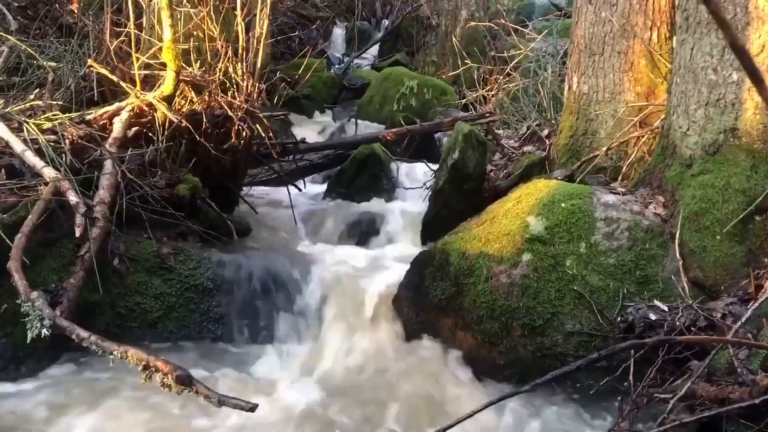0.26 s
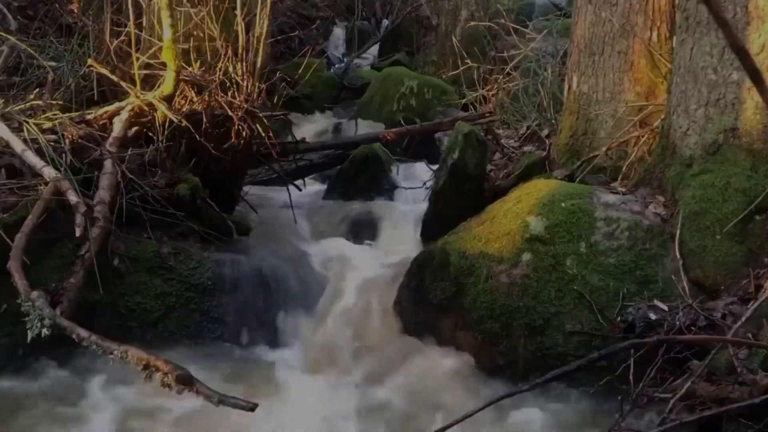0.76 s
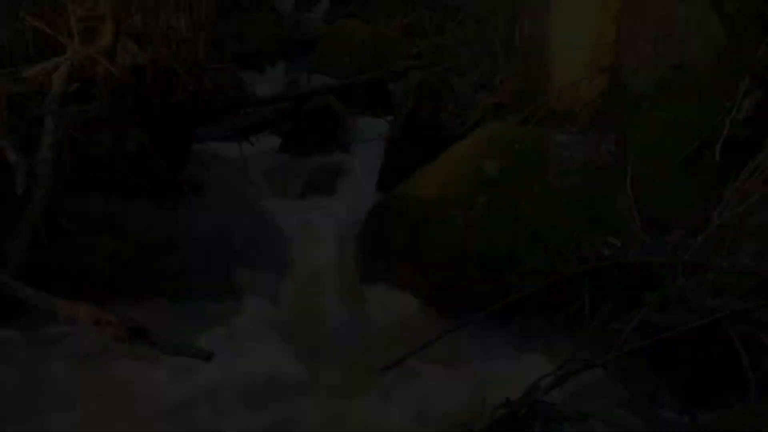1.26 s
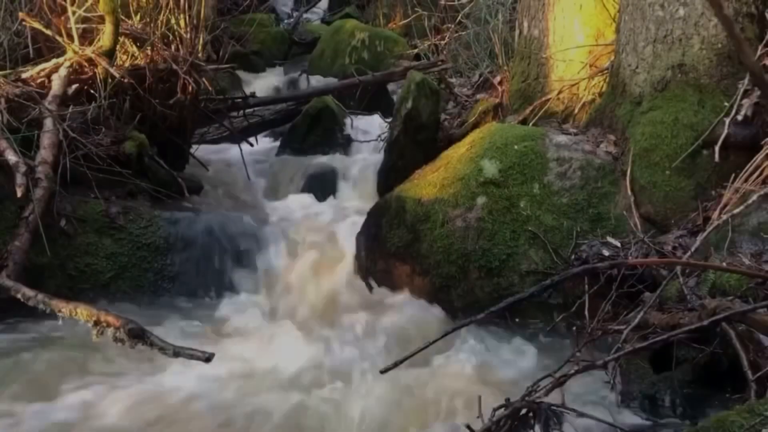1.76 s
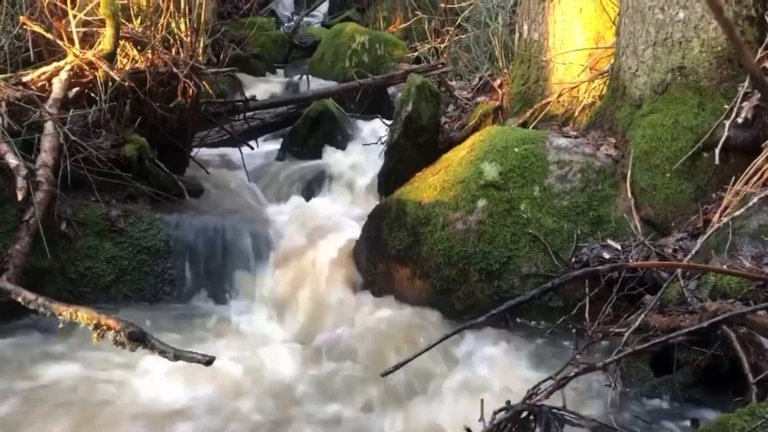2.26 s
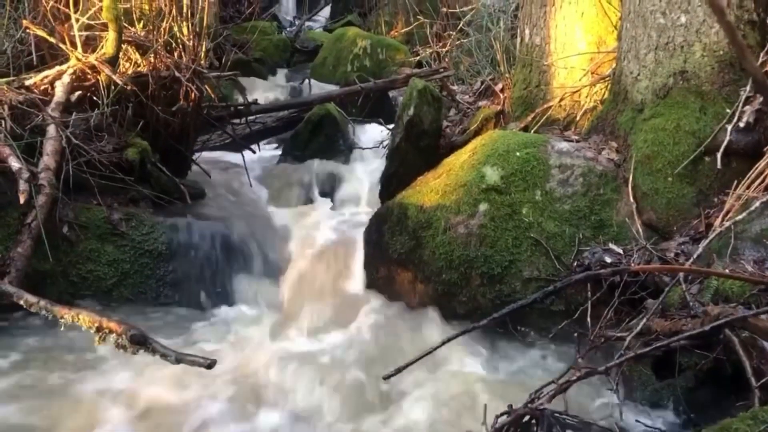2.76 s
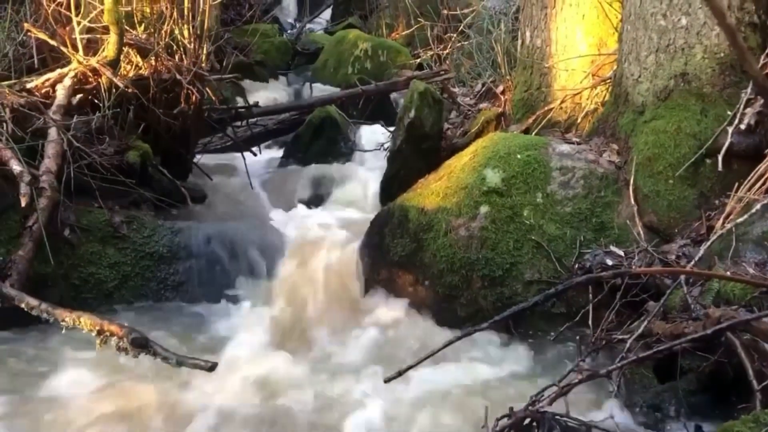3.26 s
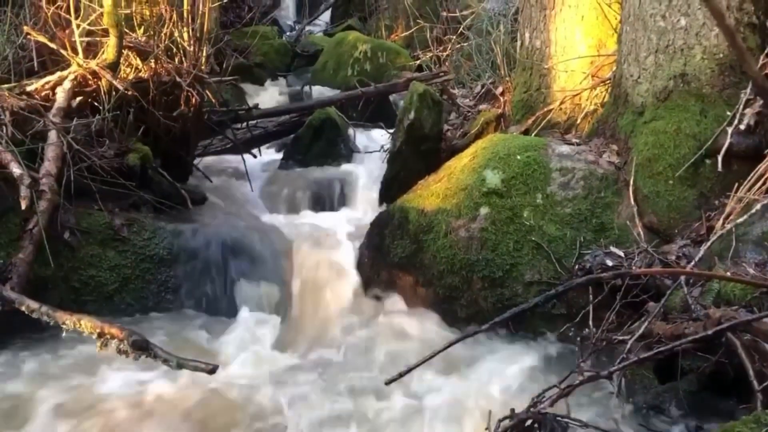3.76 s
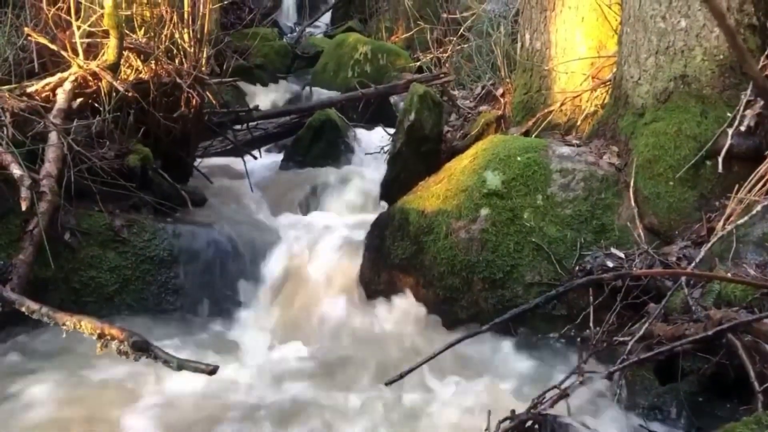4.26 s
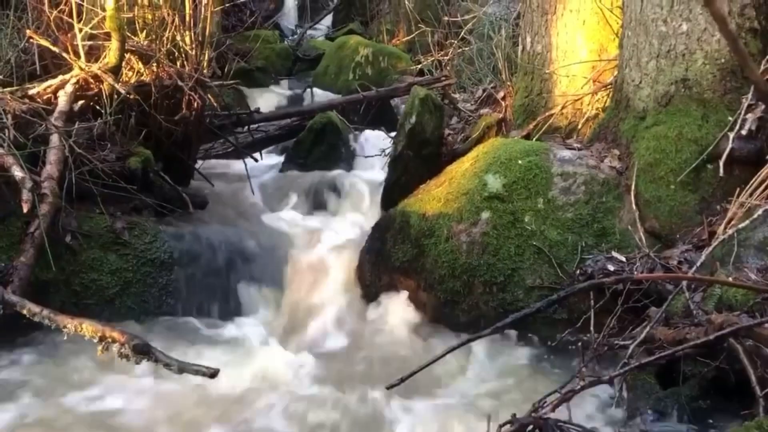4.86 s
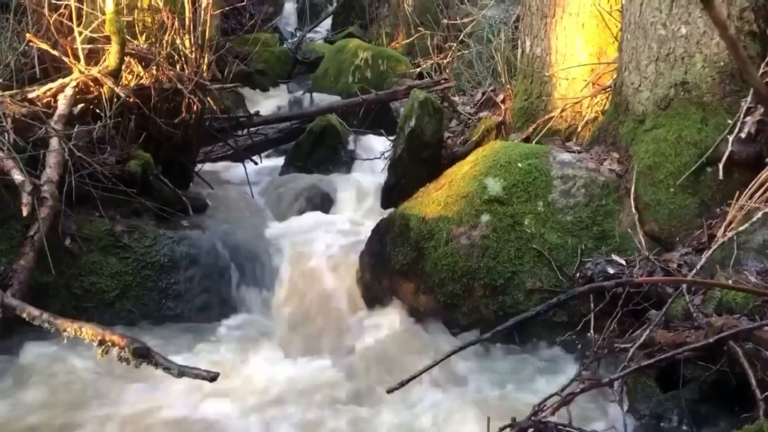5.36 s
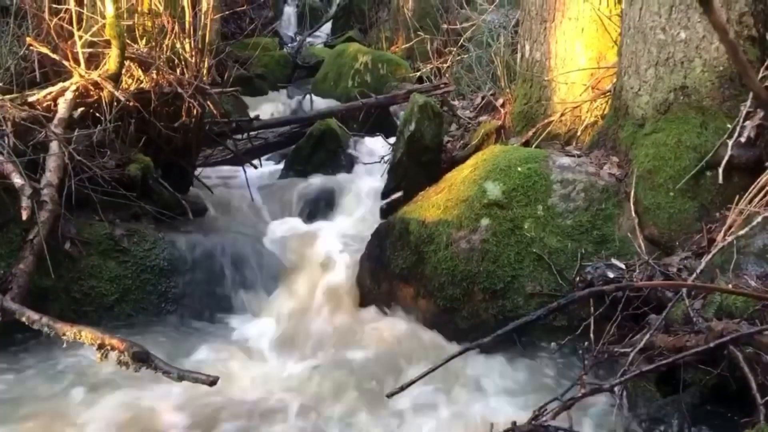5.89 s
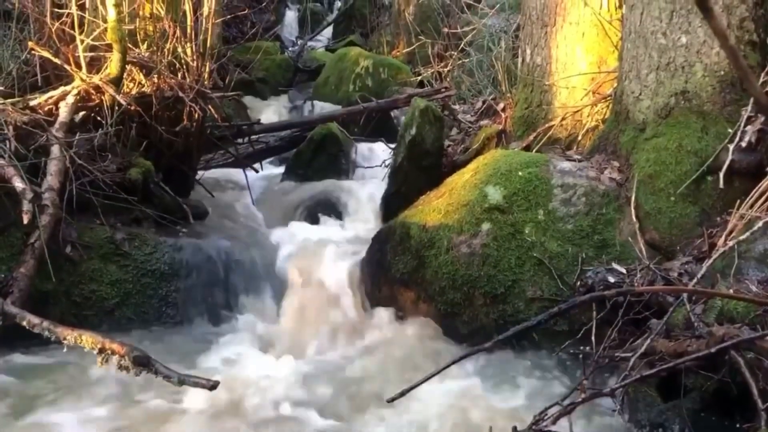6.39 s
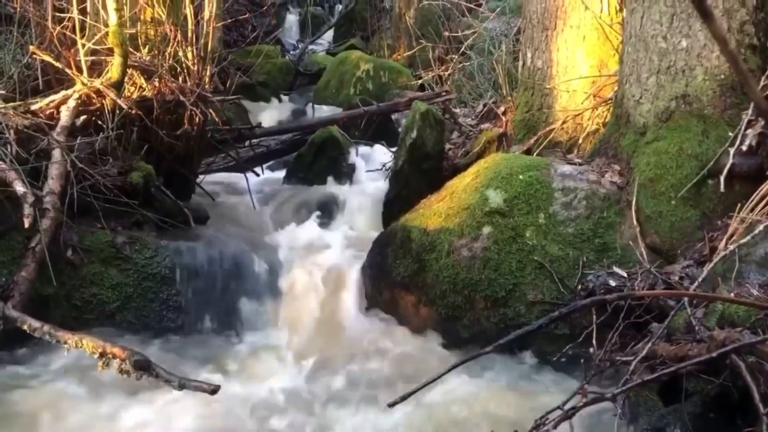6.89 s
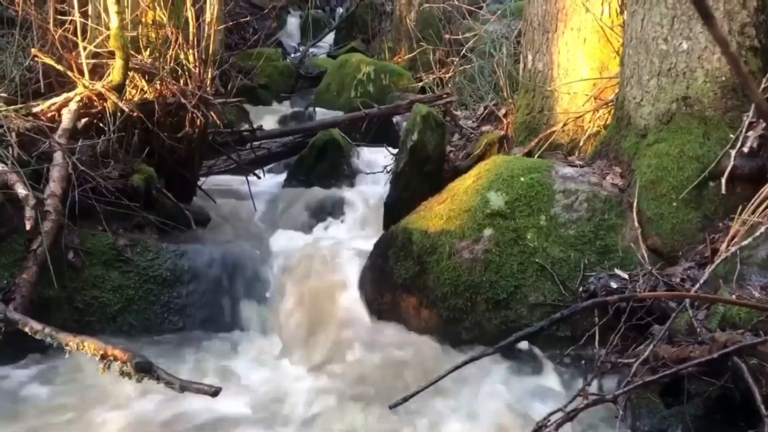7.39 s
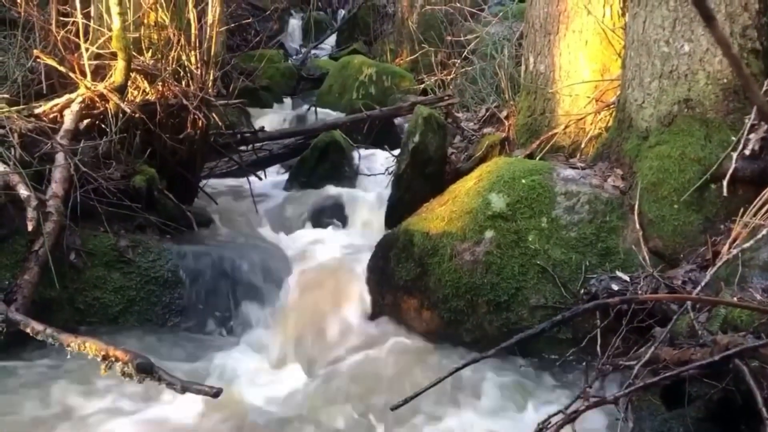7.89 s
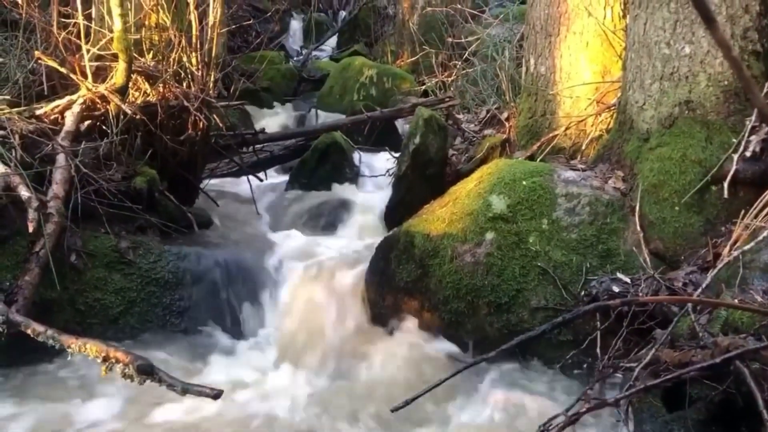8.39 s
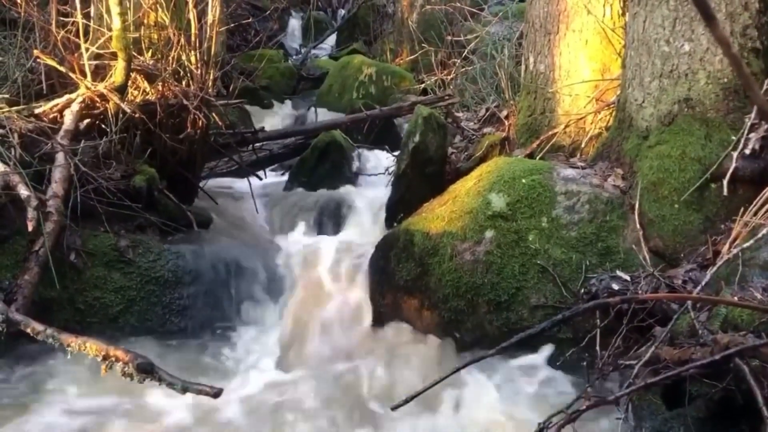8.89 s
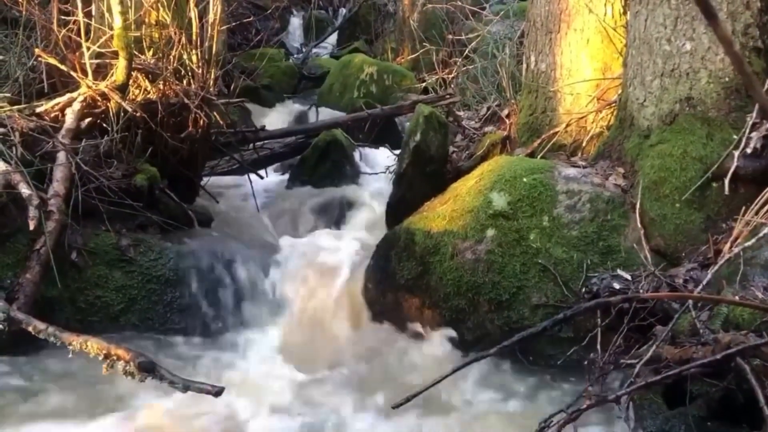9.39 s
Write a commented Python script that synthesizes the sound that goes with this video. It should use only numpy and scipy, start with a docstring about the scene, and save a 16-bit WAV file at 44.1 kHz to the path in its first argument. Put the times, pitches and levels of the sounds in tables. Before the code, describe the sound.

White water plunges between boulders into a churning pool, heard from the bank of a forest stream. A bubbling roar carries a hiss of foam above and a soft rumble below. The sound fades away to a moment of silence about a second in, then fades back up. It runs on steadily with slight surges, dotted with small gulps, glugs, sloshes and the bright ticks of drops.

```python
"""White water plunges down a small cascade between boulders into a churning pool.
The plunge roars and traps ringing air bubbles; bursting foam and flung drops hiss above it.
Single gulps, glugs, sloshes, ticks and slaps stand out, and bubble clouds rumble below.
The sound fades out, is silent from 1.04 to 1.15 s and fades back in."""
import sys
import numpy as np
from scipy import signal
from scipy.fft import rfft, irfft, next_fast_len
from scipy.io import wavfile

SR = 44100
rng = np.random.default_rng(int(sys.argv[2]) if len(sys.argv) > 2 else 0)


def log_audio(samples):
    """Write samples as a 16-bit WAV file to the path given in sys.argv[1]."""
    # one column per channel
    frames = np.atleast_2d(samples).T
    # limit to full scale, then quantise
    limited = np.clip(frames, -1, 1)
    pcm = np.round(limited * 32767).astype(np.int16)
    wavfile.write(sys.argv[1], SR, pcm)


N = 425565


def gain_of(db):
    """Decibels to amplitude."""
    return 10 ** (np.asarray(db) / 20)


def unit_rms(x):
    """Scales to rms 1."""
    return x / np.sqrt(np.mean(x ** 2) + 1e-20)


def curve(rows):
    """Interpolates (seconds, value) rows at every sample."""
    return np.interp(np.arange(N) / SR, *np.transpose(rows))


def coloured(x, rows):
    """Filters x by (Hz, dB) rows, then scales to rms 1."""
    size = next_fast_len(N)
    hz, db = np.transpose(rows)
    shape_db = np.interp(np.log(np.fft.rfftfreq(size, 1 / SR) + 1), np.log(hz), db)
    return unit_rms(irfft(rfft(x, size) * gain_of(shape_db), size)[:N])


def wander(rate_hz):
    """Smooth random motion of rms 1, strongest near rate_hz."""
    size = next_fast_len(N)
    ratio = np.fft.rfftfreq(size, 1 / SR) / rate_hz
    spectrum = rfft(rng.standard_normal(size)) * ratio / (1 + ratio ** 3)
    return unit_rms(irfft(spectrum, size)[:N])


def add(mix, start_s, sound):
    """Mixes a sound in, in place."""
    part = mix[max(round(start_s * SR), 0):][:len(sound)]
    part += sound[:len(part)]


def bubble(hz, cycles, rise):
    """Trapped air rings, decaying to 1/e in `cycles`; its pitch rises as it nears the surface."""
    age = np.arange(int(5 * cycles / hz * SR)) * hz / (SR * cycles)  # in decay times
    turns = cycles * (age + rise * age ** 2 / 2)
    return np.sin(2 * np.pi * turns) * np.exp(-age) * (1 - np.exp(-2 * turns))


def swarm(low_hz, high_hz, per_s, cycles, rise, spread_db, sizes=40):
    """Bubbles of many sizes, most faint and a few strong, with even power per Hz."""
    out = np.zeros(N)
    per_size = int(per_s * N / SR / sizes)
    for hz in np.geomspace(low_hz, high_hz, sizes):
        when, strength = rng.random((2 ** 13, 2))[:per_size].T
        gains = gain_of(spread_db * np.minimum(-np.log(1 - strength), 4))
        signs = (-1) ** np.arange(len(gains))
        births = np.bincount((when * N).astype(int), gains * signs, N)
        ring = bubble(hz, cycles * 2 ** rng.uniform(-0.52, 0.56), rise)
        out += np.sqrt(hz) * unit_rms(signal.oaconvolve(births, ring)[:N])
    return unit_rms(out)


# Each row: frequency in Hz, relative level in dB.
PLUNGE_SPECTRUM = [(90, -31.5), (190, -7), (255, 0.74), (310, -1), (390, 0.5), (480, -2), (570, -3),
                   (740, 0.5), (890, -2), (1020, -5), (1270, -5.5), (1600, -11.5), (2100, -17), (9000, -45)]


def plunge(flow_db, roar_db=4.5, churn_db=-0.3, level_db=-29.0):
    """The falling jet drags air under: near bubbles gurgle over the blurred roar of the rest."""
    gurgle = swarm(179.5, 3205, per_s=2500, cycles=5.55, rise=0.0888, spread_db=2.0)
    roar = gain_of(roar_db) * rng.standard_normal(N)
    water = coloured(gurgle + roar, PLUNGE_SPECTRUM)
    churn = gain_of(churn_db * wander(rate_hz=26))
    return unit_rms(water * churn) * gain_of(level_db + flow_db)


# Each row: time in seconds, level offset in dB.
FLOW_DRIFT = [(0, 1.65), (2.3, 0.5), (2.85, -0.2), (3.15, 0.7), (3.8, -0.15), (4.3, 0.5), (5.05, 0),
              (5.7, 0.5), (6.6, 0), (7.4, 0.5), (7.85, -1), (8.3, 0.8), (8.6, -0.2), (9.4, 0.7),
              (9.65, -0.2)]
# Each row: centre in seconds, level offset in dB (negative for a lull), length in seconds.
FLOW_SURGES = [(0.25, 1.5, 0.073), (0.515, -3.5, 0.084), (2.113, 1, 0.066), (2.368, 2, 0.095),
               (2.494, -1, .09), (2.588, 1, 0.18), (3.225, 2.4, 0.12), (3.44, 1, 0.06), (3.65, 0, 0.085),
               (3.904, -2, 0.056), (4.447, 0.5, 0.11), (5.23, 2.5, .1), (5.455, 2.5, 0.072),
               (5.88, -2, 0.098), (5.953, 1.5, .07), (7.03, 1, .11), (7.728, 1.5, .08), (8.55, -1.5, 0.089),
               (8.865, -1.5, 0.076), (8.936, 1, 0.082)]


def flow(ripple_db=0.23, ripple_hz=8.3):
    """How hard the water falls, in dB: slow drift, random ripple, surges as slugs of water drop."""
    flow_db = curve(FLOW_DRIFT) + ripple_db * wander(ripple_hz)
    for centre_s, db, length_s in FLOW_SURGES:
        add(flow_db, centre_s - length_s / 2, db * np.hanning(round(length_s * SR)))
    return flow_db


# Each row: frequency in Hz, relative level in dB.
SPRAY_SPECTRUM = [(600, -23), (1500, 6), (2300, 1), (3300, 1), (4400, -0.5), (5600, -1), (7000, -2.5),
                  (8800, -4), (9500, -33.5)]


def spray(flow_db, hiss_db=3.0, drops_db=-1.8, plink_db=-7.0, burst_db=0.56, clump_db=2.0,
          level_db=-34.0):
    """Tiny bubbles fizz and plink and drops tick on the water, in quick bursts over a smooth hiss."""
    fizz = swarm(1205, 9470, per_s=6500, cycles=6.0, rise=0.019, spread_db=0.5)
    plinks = swarm(1500, 8500, per_s=360, cycles=36, rise=0.034, spread_db=2.0)
    impacts = rng.standard_normal(N) * (rng.random(N) < 2600 / SR)  # 2600 per second
    drops = unit_rms(impacts * gain_of(clump_db * wander(rate_hz=45)))
    hiss = gain_of(hiss_db) * rng.standard_normal(N)
    water = fizz + gain_of(plink_db) * plinks + gain_of(drops_db) * drops + hiss
    bursts = gain_of(burst_db * wander(rate_hz=7.3))
    return unit_rms(coloured(water, SPRAY_SPECTRUM) * bursts) * gain_of(level_db + flow_db)


# Each row: start in seconds, relative level in dB, pitch in Hz.
GULP_BUBBLES = [(0.055, -24, 760), (0.248, -18, 697), (0.447, -19, 705), (1.222, -11, 880),
                (1.447, -11, 415), (1.994, -18, 810), (2.099, -22, 360), (2.349, -22, 679.5),
                (2.359, -25, 374), (2.409, -18, 726), (2.579, -21, 336), (2.6, -18.5, 412),
                (2.721, -22, 152), (2.925, -23, 336), (3.492, -20, 403), (3.958, -17, 356),
                (3.962, -18, 735), (4.445, -20.5, 750), (4.943, -20, 805), (5.414, -21, 710),
                (5.487, -19, 580), (5.794, -21, 594), (6.296, -20, 565), (6.718, -18.5, 700),
                (7.013, -24, 750), (7.069, -22, 744), (7.731, -17.5, 730), (7.959, -22, 860),
                (8.212, -17, 1170), (8.627, -20, 790), (8.805, -23, 770), (8.808, -25, 900),
                (8.94, -21, 474), (9.168, -21, 790)]


def gulps(level_db=0.5):
    """Single bubbles stand out of the roar; smaller ones ring for more cycles."""
    out = np.zeros(N)
    for start_s, db, hz in GULP_BUBBLES:
        add(out, start_s, gain_of(db + level_db) * bubble(hz, cycles=0.17 * np.sqrt(hz), rise=0.029))
    return out


# Each row: start in seconds, peak in dB, first and last pitch in Hz, length in seconds.
GLUG_POCKETS = [(2.191, -26.5, 363, 440, .05), (2.684, -31, 720, 820, 0.038), (3.597, -28, 695, 800, .045),
                (4.378, -37, 210, 340, .035), (4.955, -29, 785, 870, 0.053), (6.238, -34, 774, 870, .035),
                (6.433, -27.5, 599, 710, 0.045), (6.957, -28, 252, 505, .052),
                (8.269, -29, 335, 430, 0.035)]


def glugs():
    """A large air pocket swells into tone and climbs in pitch as it surfaces."""
    out = np.zeros(N)
    for start_s, db, first_hz, last_hz, length_s in GLUG_POCKETS:
        progress = np.linspace(0, 1, int(length_s * SR))
        turns = np.cumsum(first_hz * (last_hz / first_hz) ** progress) / SR
        swell = np.sin(np.pi * progress)
        add(out, start_s, gain_of(db) * swell * np.sin(2 * np.pi * turns))
    return out


# Each row: centre in seconds, relative level in dB, first and last pitch in Hz, length in seconds.
SLOSH_RUNS = [(1.86, -34.5, 554, 620, .07), (1.91, -31, 775, 887, .045), (2.118, -33, 300, 235, .04),
              (3.659, -31.5, 610, 1040, 0.062), (4.46, -31, 804, 600, 0.066),
              (4.817, -36, 1501, 1470, 0.076), (5.37, -31.5, 900, 960, 0.049), (5.642, -35, 330, 308, .12),
              (5.768, -35, 1592, 1100, 0.098), (6.297, -34.5, 744, 504, .06), (7.061, -37, 716, 860, 0.07),
              (7.457, -31.5, 855, 706, .07), (7.641, -31, 337.8, 370, .08), (8.06, -42, 920, 886, 0.043),
              (8.214, -37.5, 1700, 1370, 0.03), (8.355, -39, 1850, 1500, .1), (8.428, -40, 1260, 1450, 0.1),
              (8.79, -35.5, 1400, 1150, 0.076), (8.962, -37, 480, 380, .06), (9.325, -35, 358, 290, 0.075),
              (9.44, -35, 1010, 1026, 0.084)]


def sloshes(level_db=-1.5, cycles=8.21, scatter=0.11, count=14):
    """An air pocket breaks into a run of bubbles that swells and dies, gliding as their size changes."""
    out = np.zeros(N)
    for centre_s, db, first_hz, last_hz, length_s in SLOSH_RUNS:
        run = np.zeros(SR // 2)
        places = (np.arange(count) + rng.random(count)) / count
        for place, detune in zip(places, rng.standard_normal(count)):
            hz = first_hz * (last_hz / first_hz) ** place * np.exp(scatter * detune)
            add(run, place * length_s, np.sin(np.pi * place) * bubble(hz, cycles, rise=0.035))
        run_rms = np.sqrt(np.sum(run ** 2) / (length_s * SR))
        start_s = centre_s - length_s / 2 - cycles / (2 * first_hz)
        add(out, start_s, gain_of(db + level_db) * run / run_rms)
    return out


# Each row: start in seconds, level in dB, pitch in Hz, decay in cycles.
NEAR_DROPS = [(0.537, -18, 7600, 4), (2.038, -15, 5300, 3.5), (3.27, -17, 3100, 3.3),
              (3.777, -22, 6350, 6.5), (4.818, -17, 7288, 3), (5.45, -21, 5850, 6), (5.456, -22, 7050, 5),
              (6.195, -23, 4800, 4), (6.2, -22, 4960, 9), (7.009, -14, 6500, 2.4), (7.333, -23, 8550, 6),
              (7.403, -23, 4500, 4.01), (7.449, -18.5, 2450, 5.2), (8.012, -19, 3500, 1.6),
              (9.233, -22, 4850, 5)]


def ticks(droplet_db=-11.0, mean_flight_s=0.011, scatter=0.2, count=4):
    """A near drop hits the water with a bright tick; fainter droplets fly up and fall back."""
    out = np.zeros(N)
    for start_s, db, hz, cycles in NEAR_DROPS:
        add(out, start_s, gain_of(db) * bubble(hz, cycles, rise=0))
        for flight_s, detune in zip(rng.exponential(mean_flight_s, count), rng.standard_normal(count)):
            droplet = bubble(hz * np.exp(scatter * detune), cycles, rise=0)
            add(out, start_s + flight_s, gain_of(db + droplet_db) * droplet)
    return out


# Each row: start in seconds, relative level in dB, band frequency in Hz, decay in seconds.
SPRAY_SLAPS = [(0.792, -32, 6860, .006), (2.354, -31, 4500, 0.011), (5.445, -35, 6000, 0.02),
               (6.19, -36, 4866, 0.012), (6.888, -32, 4990, .012), (7.393, -31, 4000, .012),
               (8.006, -32, 3100, .008), (8.628, -33, 6000, 0.023), (9.224, -35, 5000, .01)]


def slaps(level_db=0.5):
    """A sheet of spray lands on rock: a short, bright puff of drops."""
    out = np.zeros(N)
    for start_s, db, hz, decay_s in SPRAY_SLAPS:
        age = np.arange(int(4 * decay_s * SR)) / (decay_s * SR)
        band = signal.butter(2, [hz * 0.86, hz * 1.3], "band", fs=SR, output="sos")
        puff = unit_rms(signal.sosfilt(band, rng.standard_normal(SR)))[:len(age)]
        envelope = np.exp(-age) * (1 - np.exp(-10 * age))
        add(out, start_s, gain_of(db + level_db) * puff * envelope)
    return out


# Each row: frequency in Hz, relative level in dB.
POOL_SPECTRUM = [(10, -34.5), (25, -26.5), (40, -23.5), (62, -8), (85, -4.5), (115, 1), (150, 0), (185, -4),
                 (260, -11.5), (500, -51.5)]


def pool(lump_db=1.0, level_db=-38.0):
    """Clouds of bubbles throb together in the pool: a lumpy rumble."""
    rumble = coloured(rng.standard_normal(N), POOL_SPECTRUM)
    lumps = gain_of(lump_db * wander(rate_hz=11))
    return gain_of(level_db) * unit_rms(rumble * lumps)


def scene():
    """All the water from the bank, in mono; one flow drives plunge and spray."""
    flow_db = flow()
    rush = pool() + plunge(flow_db) + spray(flow_db)
    return (rush + gulps() + glugs() + slaps() + sloshes() + ticks())[None]


# Each row: time in seconds, gain from 0 to 1.
FADE_GAIN = [(.55, 0.77), (.8, 0.4), (1.035, 0.14), (1.042, 0), (1.152, 0), (1.6, 0.43), (2.0, 0.86)]


def record(dry, cutoff_hz=9350):
    """Fade out and back in, then a steep low-pass."""
    lowpass = signal.firwin(511, cutoff_hz, window=("kaiser", 9), fs=SR)
    return signal.oaconvolve(dry * curve(FADE_GAIN), lowpass[None], "same")


dry = scene()
out = record(dry)
log_audio(out)
```